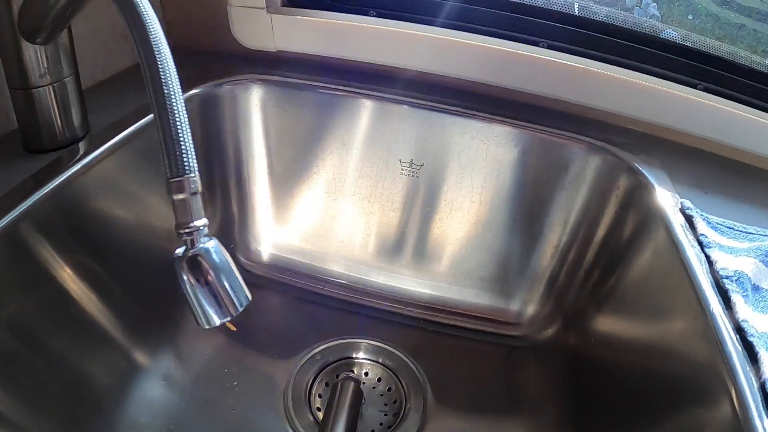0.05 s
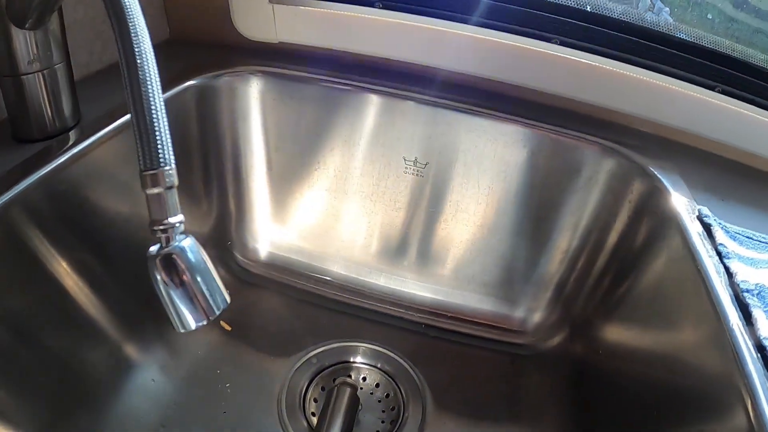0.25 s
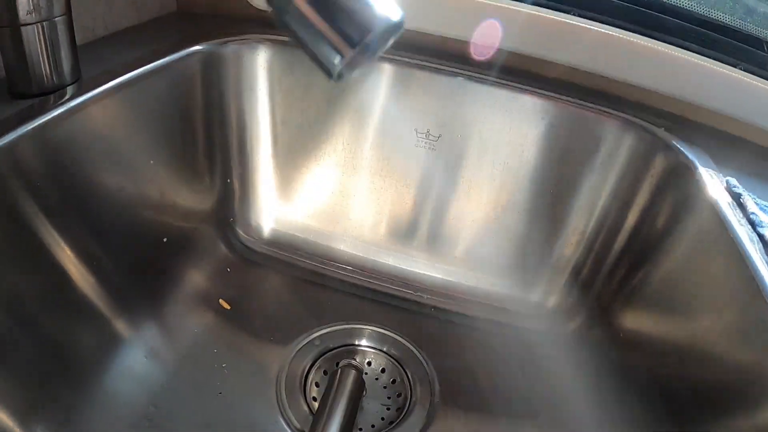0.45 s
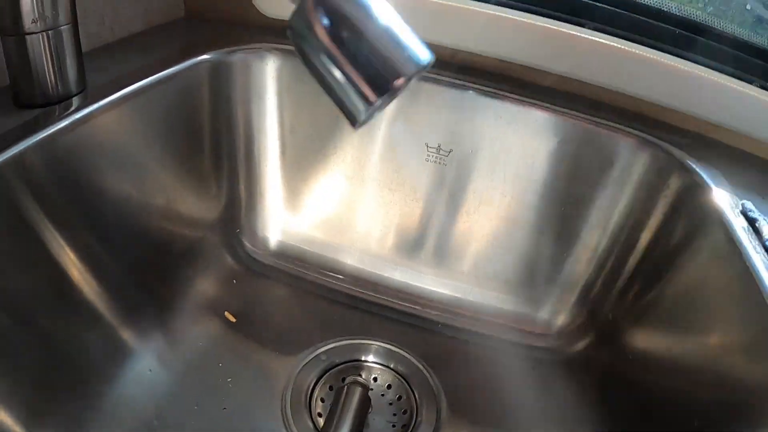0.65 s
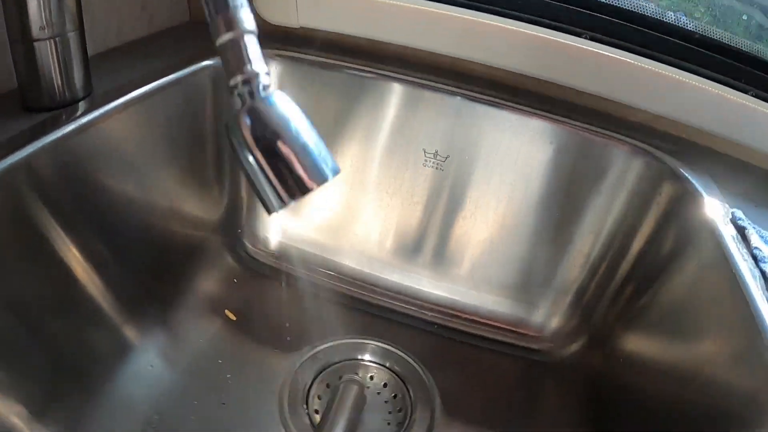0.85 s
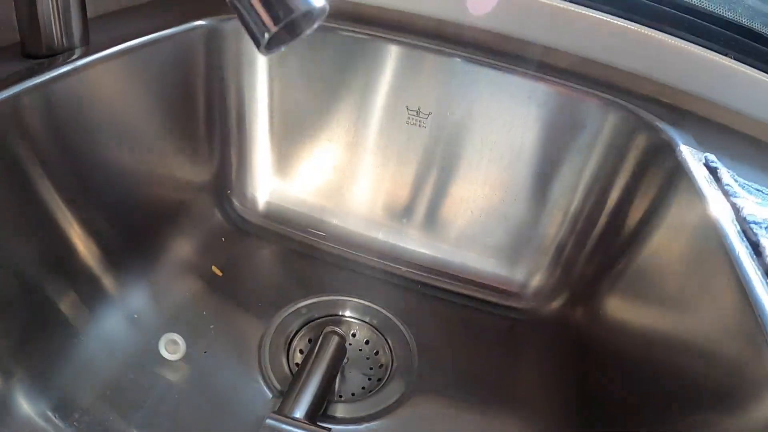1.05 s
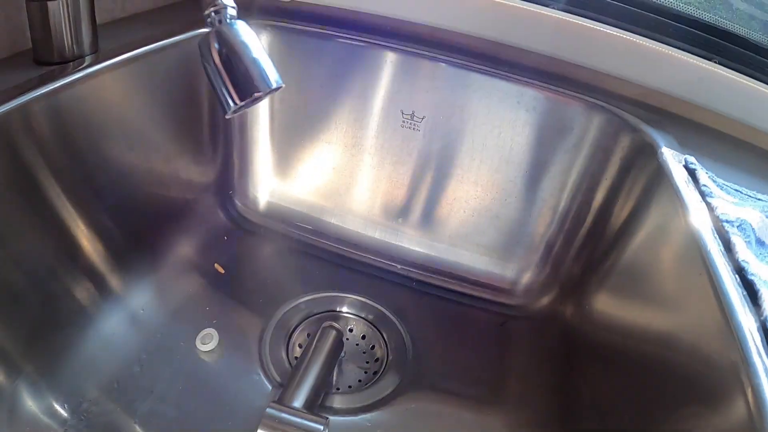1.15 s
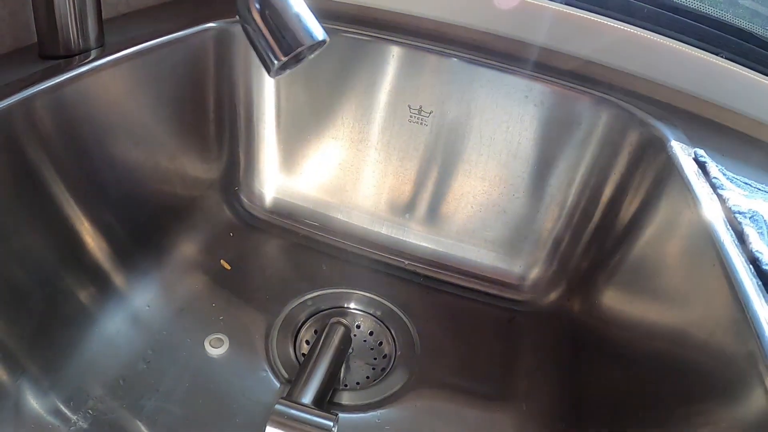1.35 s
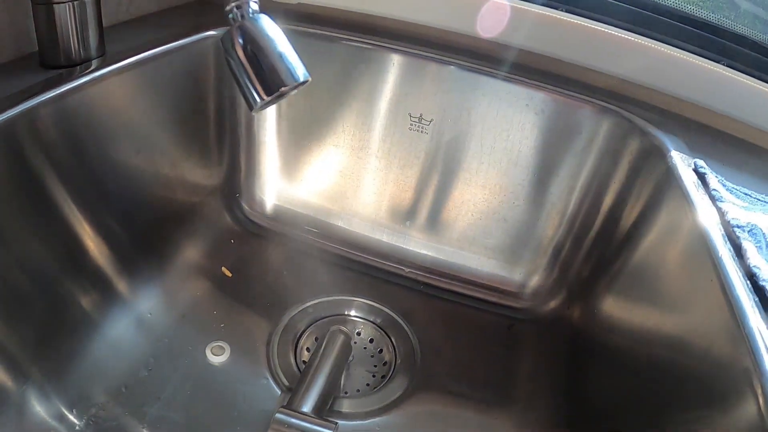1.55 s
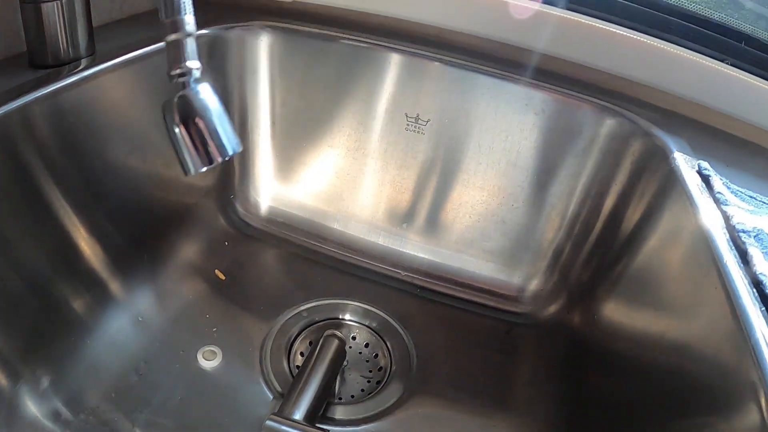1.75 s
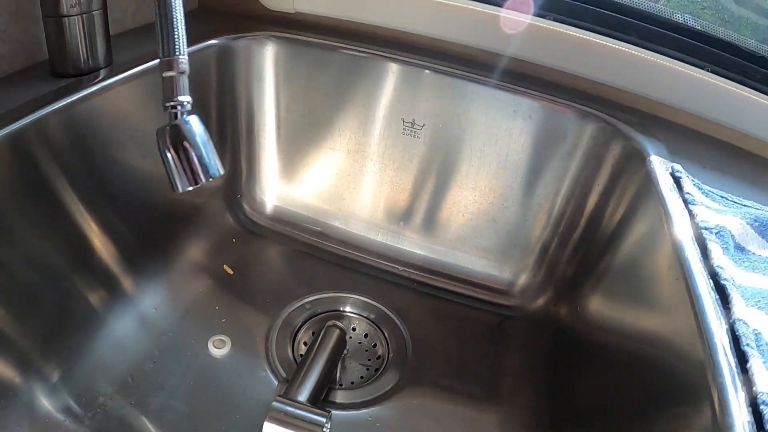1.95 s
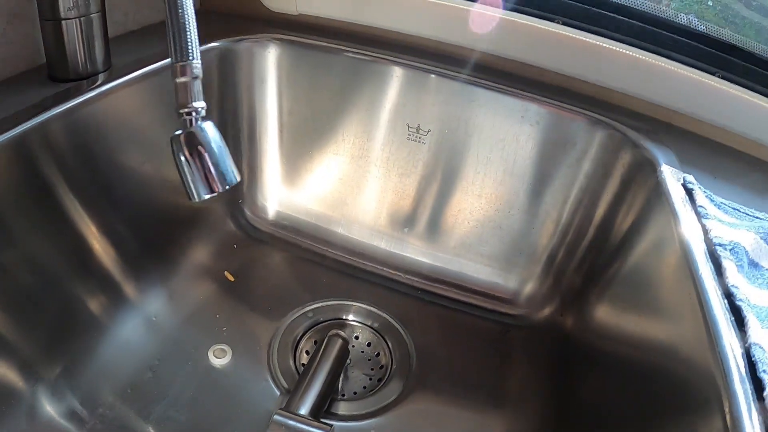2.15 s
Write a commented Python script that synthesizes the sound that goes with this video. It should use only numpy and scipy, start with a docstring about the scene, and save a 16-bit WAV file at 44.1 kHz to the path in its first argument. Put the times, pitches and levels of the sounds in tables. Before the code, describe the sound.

A loud hiss of compressed air from a faucet nozzle over a steel sink; first low rumble, thin hum and a soft thud, then a sharp pop, steady blast with wind buffeting a close microphone, sudden stop.

```python
"""Compressed air bursts from a loose faucet hose over a steel sink in a small trailer kitchen.
Before it: a distant low rumble, a thin hum, one soft thud with faint dry ticks; after it a weak leak and a last spit.
A pop opens the burst; the jet is noise hissing through nozzle and basin resonances, dulling as pressure sags.
Its draught buffets the microphone as lumpy low noise; the stereo image narrows and gain control turns loud
moments down."""
import sys
import numpy as np
from scipy import signal
from scipy.fft import rfft, irfft
from scipy.io import wavfile
from scipy.ndimage import uniform_filter1d

SR = 44100
rng = np.random.default_rng(int(sys.argv[2]) if len(sys.argv) > 2 else 0)


def decibels_to_gain(level_db):
    """Convert a level in decibels to a linear amplitude gain (20 dB per decade)."""
    exponent = np.asarray(level_db, float) / 20
    return 10 ** exponent


def master(y):
    """Save y as 16-bit WAV."""
    cut = np.clip(np.atleast_2d(y).T, -1, 1)
    pcm = np.round(cut * 32767)  # scale
    wavfile.write(sys.argv[1], SR, pcm.astype(np.int16))


N = 97020
T = np.arange(N) / SR
BURST_S = .3926   # the plug of water leaves the nozzle
LEFT_RIGHT_HALVES = np.array([[.5], [-.5]])   # shares a left-minus-right dB between the channels


def rms_one(x):
    """Scale to rms 1."""
    return x / np.sqrt(np.mean(x ** 2) + 1e-20)


def in_time(rows):
    """Columns of a table as lines in time; the end rows hold before and after."""
    s, *columns = np.transpose(rows)
    return [np.interp(T, s, column) for column in columns]


def at_hz(points, hz):
    """Read a curve over frequency on a log axis."""
    points_hz, values = np.transpose(points)
    return np.interp(np.log(hz), np.log(points_hz), values)


def drift(rate_hz):
    """Slow random wandering of rms about 1: noise through two equal low-pass poles at rate_hz."""
    every = 20   # samples between the points that are joined by lines
    warm_up = 2000
    r = np.exp(-2 * np.pi * rate_hz * every / SR)
    noise = rng.standard_normal(N // every + 2 + warm_up)
    slow = signal.lfilter([1], [1, -2 * r, r * r], noise)[warm_up:]
    return np.interp(np.arange(N) / every, np.arange(len(slow)), rms_one(slow - slow.mean()))


def coloured(spectrum, count=2):
    """Unrelated noises shaped by the given curve, as spectra, and their frequencies."""
    hz = np.maximum(np.fft.rfftfreq(N, 1 / SR), 1)
    inside = (hz >= spectrum[0][0]) & (hz <= spectrum[-1][0])
    white = rfft(rng.standard_normal((count, N)))
    return white * decibels_to_gain(at_hz(spectrum, hz)) * inside, hz


def band_noise(low_hz, high_hz, order, shape):
    """White noise through a band-pass, at rms 1."""
    band = signal.butter(order, [low_hz, high_hz], "band", fs=SR, output="sos")
    return rms_one(signal.sosfilt(band, rng.standard_normal(shape)))


def spread(mid, side, alike):
    """Left and right from two noises; alike 1 is mono, 0 unrelated channels."""
    alike = np.clip(alike, 0, 1)
    common = np.sqrt((1 + alike) / 2) * mid
    opposed = np.sqrt((1 - alike) / 2) * side
    return common + opposed * [[1], [-1]]


def band_shares(hz, pivot_hz, first, last, per_octave):
    """Overlapping band shapes that add up to one, with their place in octaves from the pivot."""
    place = np.clip(per_octave * np.log2(hz / pivot_hz), first, last)
    return [(k / per_octave, np.cos(np.pi / 2 * np.clip(place - k, -1, 1)) ** 2)
            for k in range(first, last + 1)]


def decay(start_s, level_db, t60_s):
    """Sudden start, then a fall of 60 dB in each t60_s."""
    return decibels_to_gain(level_db - 60 * np.maximum(T - start_s, 0) / t60_s) * (T > start_s)


def struck(start_s, rise_s, modes):
    """Damped sine modes set ringing by one blow, swelling in over rise_s."""
    t = np.maximum(T - start_s, 0)
    ringing = sum(decibels_to_gain(db - 60 * t / t60) * np.sin(2 * np.pi * hz * t) for hz, db, t60 in modes)
    return (1 - np.exp(-t / rise_s)) * ringing


def rumble():
    """Distant rumble: low-weighted noise, nearly mono in the bass and wider in the treble."""
    # colour of the rumble: f/Hz, relative level per Hz/dB
    rumble_colour = [(15, -33.5), (30, -17.5), (50, -1), (70, 3.5), (110, -4.5), (170, -16), (280, -36.5),
                     (600, -33.5), (850, -44), (1050, -32.5), (1400, -40.5), (1900, -45.5), (2800, -55.5),
                     (5000, -59.5), (9000, -74.5)]
    # its strength: t/s, level/dB
    rumble_course = [(0, -39.5), (.37, -35), (1.9, -44.5), (2.2, -40.5)]
    # likeness of the channels: f/Hz, likeness (0-1)
    rumble_alike = [(30, 1), (200, .98), (500, 0.78), (1400, 0.83), (3000, 0.69), (9000, 0.039)]
    (mid, side), hz = coloured(rumble_colour)
    noise = irfft(spread(mid, side, at_hz(rumble_alike, hz)), N)
    level_db, = in_time(rumble_course)
    return rms_one(noise) * decibels_to_gain(level_db)


def hum():
    """A thin wavering tone that fades out as the air starts."""
    centre_hz, mean_db, stop_s, fade_s = 464, -55.5, .42, .03
    phase = 2 * np.pi * np.cumsum(centre_hz + 0.37 * drift(4.5)) / SR
    tone = np.sqrt(2) * np.sin(phase)
    return tone * decibels_to_gain(mean_db + 2.7 * drift(8)) * np.clip((stop_s - T) / fade_s, 0, 1)


def thud():
    """A soft knock sets a few low cabinet modes ringing."""
    # cabinet modes: f/Hz, level/dB, t60/s
    cabinet_modes = [(113, -15, .15), (149, -23, .09), (330, -63, 0.13), (700, -47, .06)]
    return struck(.2275, .008, cabinet_modes)   # start s, rise s


def ticks():
    """Faint short bursts of treble noise around the thud, unrelated left and right."""
    # dry ticks: t/s, starting level/dB
    tick_starts = [(.229, -67), (0.261, -69), (.268, -71)]
    noise = band_noise(2500, 8000, 2, (2, N))
    return noise * sum(decay(s, db, t60_s=.021) for s, db in tick_starts)


def draught():
    """Moving air on the microphone ports: lumpy low noise, with a brighter crumple in the gusts."""
    # gusts: t/s, low level/dB (under 170 Hz), middle level/dB (to 450 Hz), high level/dB, likeness (0-1)
    gust_course = [(0.39, -48.5, -56, -47, 0.99), (0.42, -22, -39, -44.5, 1),
                   (0.48, -31.5, -23.5, -35, 0.92), (0.508, -24.5, -32, -40.5, 0.25),
                   (0.602, -14.5, -22.5, -35.5, 0.49), (0.62, -32, -33.5, -34, 0.37),
                   (0.656, -23, -24, -38.5, 0.8), (0.838, -27, -38, -37, 0.4), (0.906, -14, -21, -35, 0.21),
                   (0.948, -26, -41, -41.5, 0.27), (1.012, -12, -20, -29, 0.17),
                   (1.042, -28.5, -33.5, -39, 0.2), (1.156, -29.5, -35.5, -42, 0.51),
                   (1.188, -22, -32.5, -44.5, 0.31), (1.21, -27.5, -37.5, -38, 0.21),
                   (1.26, -14.5, -21.5, -35, 0.13), (1.374, -19, -24.5, -28.5, 0.19),
                   (1.388, -9, -9.5, -17.5, 0.77), (1.416, -16.5, -24, -28, 0.43),
                   (1.46, -21, -17, -28, 0.64), (1.534, -20, -36, -47.5, 0.4),
                   (1.596, -14, -15, -33.5, 0.49), (1.62, -21, -29.5, -36, 0.46),
                   (1.638, -14.5, -20, -24, 0.87), (1.706, -15.5, -26, -35.5, 0.74),
                   (1.724, -15, -21, -28.5, 0.69), (1.764, -28, -23.5, -35, 0.4),
                   (1.792, -16.5, -23, -37, 1), (1.874, -31, -42, -71, 0.64),
                   (1.924, -26.5, -53, -60, 0.51), (1.96, -31, -63, -63, 0.35), (2.02, -69, -77, -82, 0.47)]
    # colours of the three layers: f/Hz, relative level per Hz/dB
    low_colour = [(12, -41), (20, -6.5), (54, 1.5), (86, -2.5), (113, -2), (200, -11.5), (260, -23),
                  (440, -120)]
    mid_colour = [(88, -26), (150, 2.5), (248, -1), (480, -13.5), (620, -32.5), (1060, -120)]
    high_colour = [(250, -37), (420, 0), (779, -5.5), (1370, -16.5), (1500, -14), (1950, -39), (3300, -120)]
    left_minus_right_db = -2.5
    low_db, mid_db, high_db, alike = in_time(gust_course)
    blowing = (T > gust_course[0][0]) & (T < gust_course[-1][0])
    gusts = drift(45)
    out = 0
    for colour, layer_db, lumps_db in [(low_colour, low_db, .8), (mid_colour, mid_db, 1.8),
                                       (high_colour, high_db, 2.5)]:
        mid, side = irfft(coloured(colour)[0], N)
        lumps = rms_one(decibels_to_gain(lumps_db * gusts))
        out = out + decibels_to_gain(layer_db) * lumps * spread(rms_one(mid), rms_one(side), alike)
    soft_edges = uniform_filter1d(blowing * 1., size=441)   # 10 ms
    return out * soft_edges * decibels_to_gain(left_minus_right_db * LEFT_RIGHT_HALVES)


def spit():
    """A last small bright puff from the nozzle: treble noise dying away."""
    return band_noise(5500, 9400, 3, N) * decay(1.888, -61, t60_s=.087)


def pop():
    """The burst opens with a short ring of the nozzle."""
    # nozzle ring: f/Hz, level/dB, t60/s
    nozzle_ring = [(4110, -10.5, 0.013), (4600, -15, .035), (5200, -22.5, 0.032), (1100, -31.5, 0.0301)]
    return struck(BURST_S, .0006, nozzle_ring)


def basin(x):
    """Dense short reflections in the steel bowl shift as the hose whips; patterns fade into each other."""
    t60_s, changes_per_s, reflected_db = .07, 5.5, -4
    t = T[:SR // 5]
    progress = T * changes_per_s
    echoes = rng.standard_normal((16, len(t))) * decibels_to_gain(-60 * t / t60_s)
    reflected = 0
    for k in range(int(progress[-1]) + 2):
        echo = echoes[k] / np.sqrt(np.sum(echoes[k] ** 2))
        fade = np.cos(np.pi / 2 * np.clip(progress - k, -1, 1))
        reflected = reflected + signal.fftconvolve(x, echo[None])[:, :N] * fade
    return (x + decibels_to_gain(reflected_db) * reflected) / np.sqrt(1 + decibels_to_gain(2 * reflected_db))


def jet():
    """Turbulent hiss through the resonances; third-octave bands flicker and tilt with the pressure."""
    # jet pressure: t/s, level/dB, slope above the pivot/dB per octave, slope below it/dB per octave
    jet_course = [(.362, -105, -8, -8), (.372, -64, -19, -2), (.391, -47, -16.5, -9),
                  (.395, -21.5, -10.5, -5.5), (.402, -18, -5, -3), (.412, -18, 5.5, 2), (.47, -16, 1.5, -1),
                  (.56, -15, 1.5, -1.5), (.62, -19.5, 1.5, -3), (.76, -18, -1.1, 0.5), (.9, -17, 0, -2),
                  (1.05, -19, -1.5, -1.35), (1.21, -19, -3, -2), (1.38, -21, -2.3, 1.7),
                  (1.53, -19, -4.7, -2.7), (1.74, -17.5, -6, -3.5), (1.765, -23, -4.5, -1.7),
                  (1.80, -48, -4, 1.5), (1.83, -53, -14, -7.5), (1.88, -65.5, -4, 3), (1.94, -68, -10, -4),
                  (2.0, -105, -8.5, -3)]
    # colour of the hiss: f/Hz, relative level per Hz/dB
    jet_colour = [(530, -47.5), (900, -17), (1320, -10), (1730, -13.5), (2200, -6.5), (2660, -9.5),
                  (3580, -1), (4600, -0.5), (7770, -13), (8550, -16), (12400, -25), (15500, -44)]
    # nozzle and basin resonances: f/Hz, width/Hz, boost/dB
    resonances = [(1360, 50, 1), (2150, 120, -0.5), (2816, 85, 4), (3270, 140, 0.5), (3565, 81, 3),
                  (3887, 80, 3), (4184, 380, 2.5), (4600, 210, 2.5), (5170, 150, -0.5), (5640, 200, 3.5),
                  (6660, 300, 3), (8760, 270, 5.5)]
    # likeness of the channels: f/Hz, likeness (0-1)
    jet_alike = [(900, .85), (2200, .88), (4000, .82), (6500, .62), (9000, .42), (12000, .25), (15500, .2)]
    # balance: f/Hz, left minus right/dB
    jet_balance = [(900, -.6), (2800, 1.5), (5000, -0.5), (8500, 0), (11000, -1.5), (14500, -9)]
    # lag of the left channel: f/Hz, phase/rad
    jet_left_lag = [(900, 0), (2000, 0.066), (5000, 0.78), (7600, 0.89), (8800, 0.68), (15500, 0)]
    pivot_hz = 5030
    top_sag_hz, top_sag_db = 11200, -24   # the highest treble fades faster: dB per s and octave

    level_db, above_db, below_db = in_time(jet_course)
    (mid, side), hz = coloured(jet_colour)
    boost_db = sum(db / (1 + (2 * (hz - f) / width_hz) ** 2) for f, width_hz, db in resonances)
    balance_db = at_hz(jet_balance, hz) * LEFT_RIGHT_HALVES
    hiss = spread(mid, side, at_hz(jet_alike, hz)) * decibels_to_gain(boost_db + balance_db)
    hiss = hiss * np.exp(-1j * at_hz(jet_left_lag, hz) * np.array([[1], [0]]))
    hiss = rfft(rms_one(basin(irfft(hiss, N))))

    together_db = 0.49 * drift(25) + 0.15 * drift(9)
    top_start = np.log2(top_sag_hz / pivot_hz)
    out = 0
    for octaves, share in band_shares(hz, pivot_hz, -8, 5, 3):
        tilt_db = above_db * max(octaves, 0) + below_db * max(-octaves, 0)
        sag_db = top_sag_db * (T - BURST_S) * max(octaves - top_start, 0)
        flicker_db = together_db + 1.0 * drift(7.2) + 0.77 * drift(78)
        out = out + irfft(hiss * share, N) * decibels_to_gain(tilt_db + sag_db + flicker_db)
    return out * decibels_to_gain(level_db)


def scene():
    """All sources at the microphone, from the background to the jet."""
    return rumble() + hum() + thud() + ticks() + draught() + spit() + pop() + jet()


def narrowed(x):
    """Turns the side signal down over time, by a different share in each octave band."""
    # stereo width: t/s, side level/dB
    width_course = [(.66, 1.5), (.85, -4.5), (1.0, -10), (1.25, -14), (1.55, -18), (1.8, -18.5), (1.9, -54),
                    (2.2, -45.5)]
    # how far each region follows it: f/Hz, share of those dB
    narrowing_share = [(300, 1.05), (1500, .45), (4000, 1.07), (10000, 0.61)]
    mid, side = (x[0] + x[1]) / 2, rfft(x[0] - x[1]) / 2
    width_db, = in_time(width_course)
    hz = np.maximum(np.fft.rfftfreq(N, 1 / SR), 1)
    narrow_side = 0
    for octaves, share in band_shares(hz, 1000, -2, 3, 1):
        band_db = width_db * at_hz(narrowing_share, 1e3 * 2 ** octaves)
        narrow_side = narrow_side + irfft(side * share, N) * decibels_to_gain(band_db)
    return np.array([mid + narrow_side, mid - narrow_side])


def ducked(x):
    """Gain control: loud moments turn the gain down; it recovers smoothly."""
    above_db, cut_per_db, window_s, release_s = -15, 0.5, 0.013, 0.013
    power = uniform_filter1d(np.mean(x ** 2, axis=0), int(window_s * SR))
    cut_db = cut_per_db * np.maximum(10 * np.log10(power + 1e-12) - above_db, 0)
    r = np.exp(-1 / (release_s * SR))
    return x * decibels_to_gain(-signal.lfilter([1 - r], [1, -r], cut_db))


def rounded(x):
    """Bends peaks smoothly so that they stay under the ceiling."""
    ceiling = 0.865
    return ceiling * np.tanh(x / ceiling)


def band_limit(x):
    """A steep low-pass at the top of the band."""
    return signal.sosfilt(signal.butter(12, 15690, fs=SR, output="sos"), x)


def record(dry):
    """The stereo image narrows, loud moments are turned down and peaks are rounded."""
    mix = rounded(ducked(narrowed(dry)))
    return band_limit(mix)


dry = scene()
out = record(dry)
master(out)
```